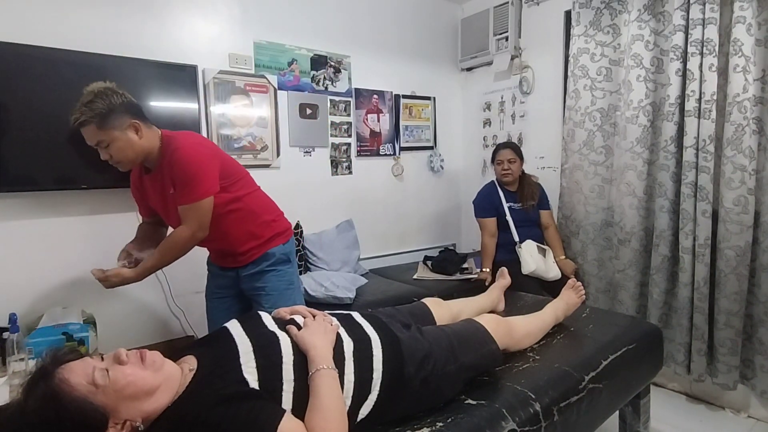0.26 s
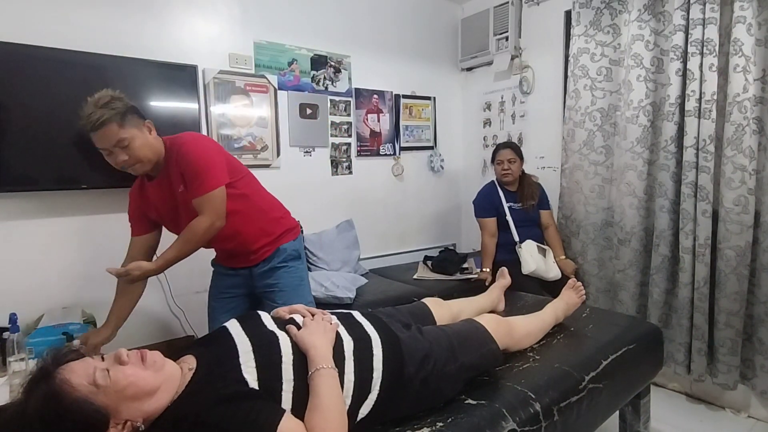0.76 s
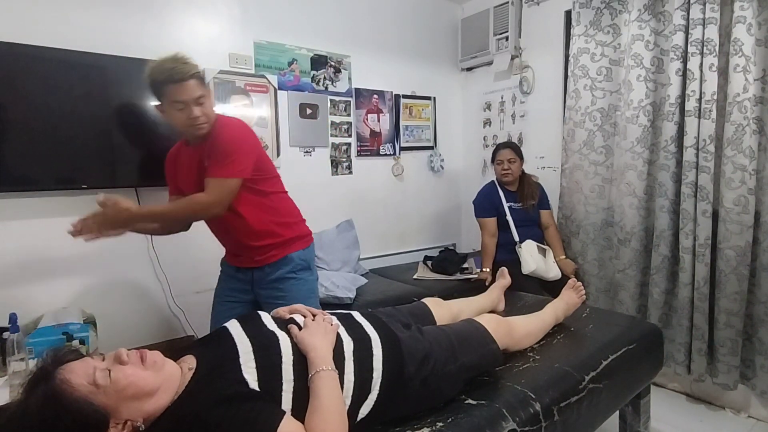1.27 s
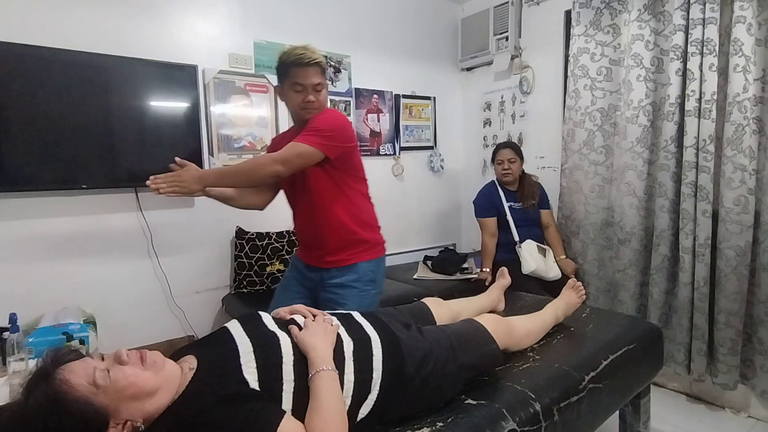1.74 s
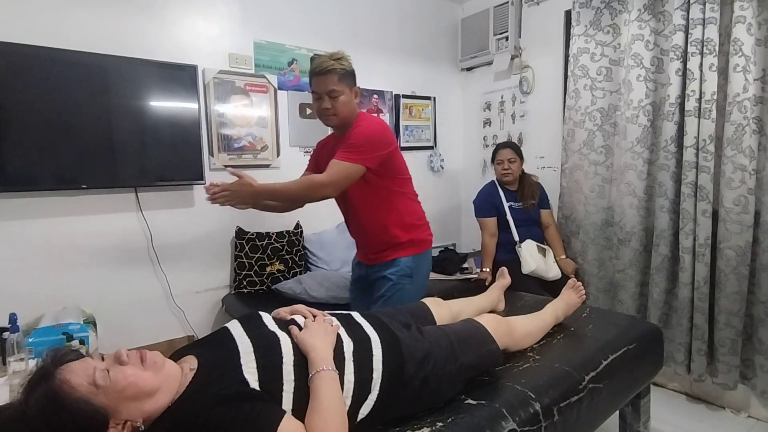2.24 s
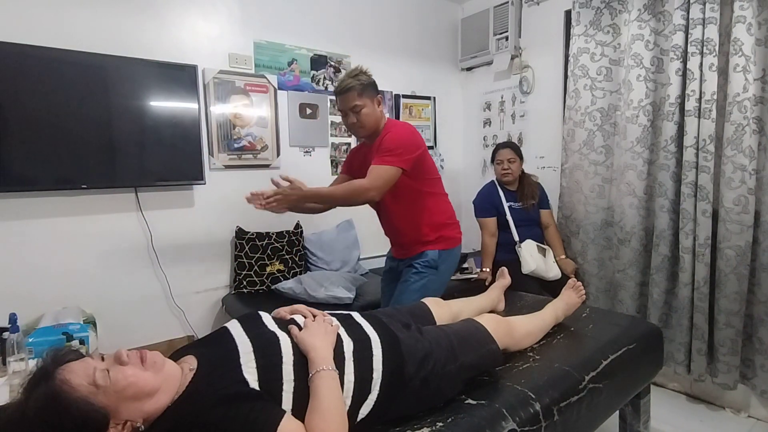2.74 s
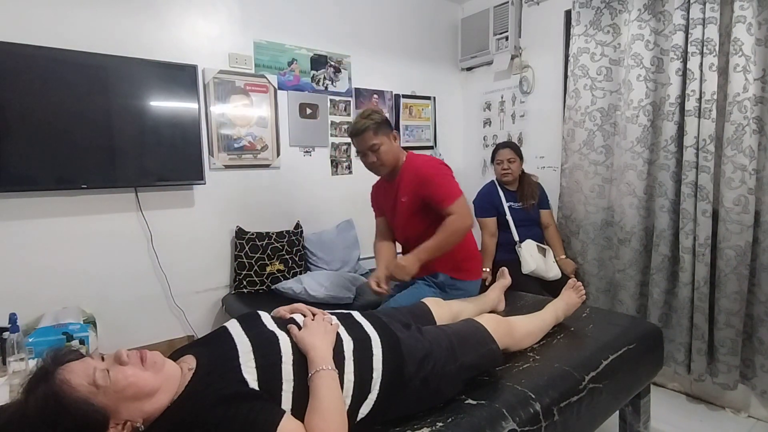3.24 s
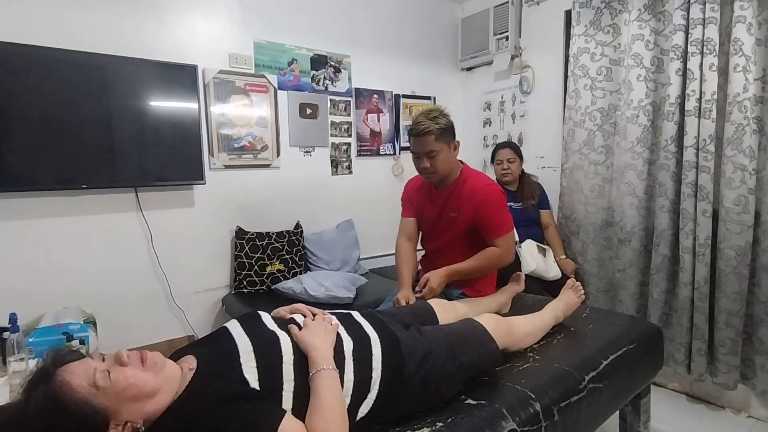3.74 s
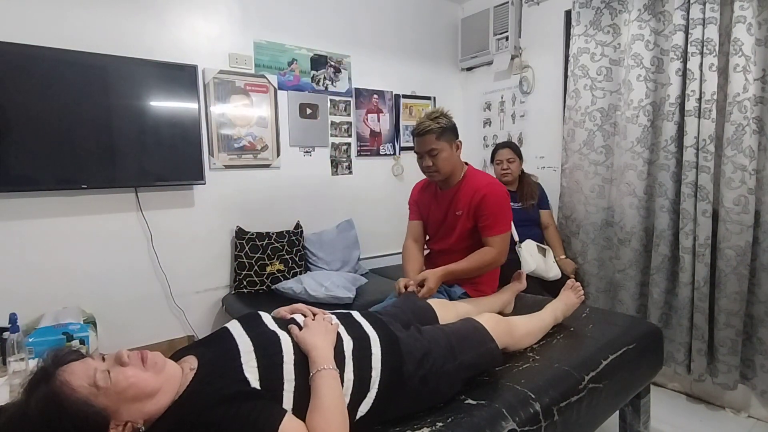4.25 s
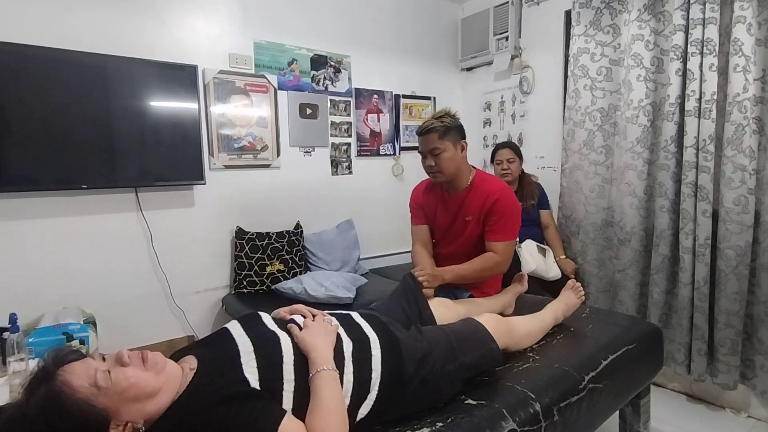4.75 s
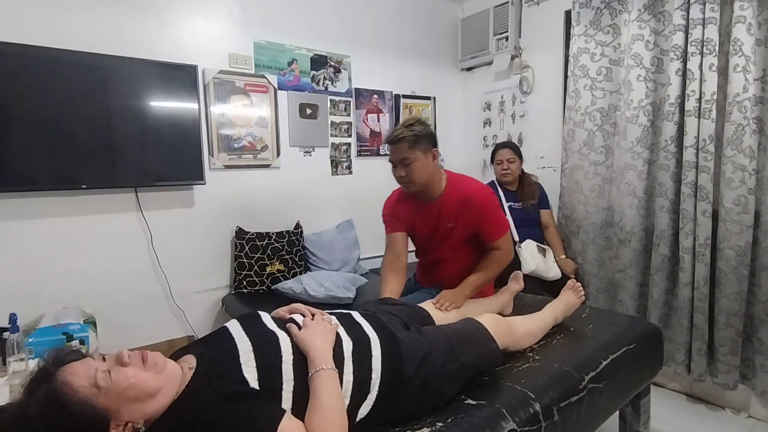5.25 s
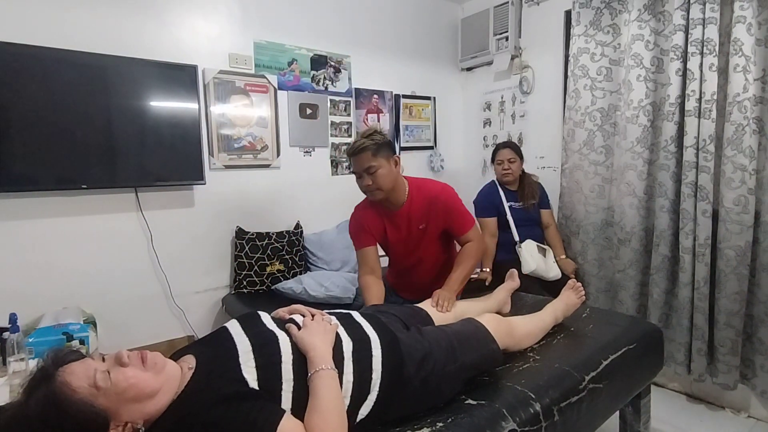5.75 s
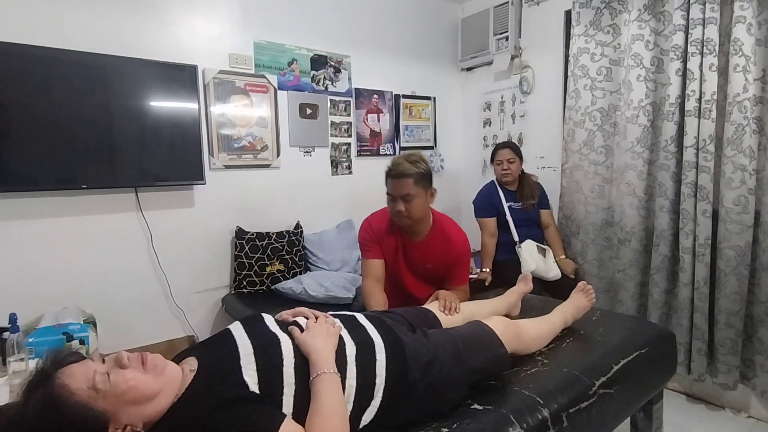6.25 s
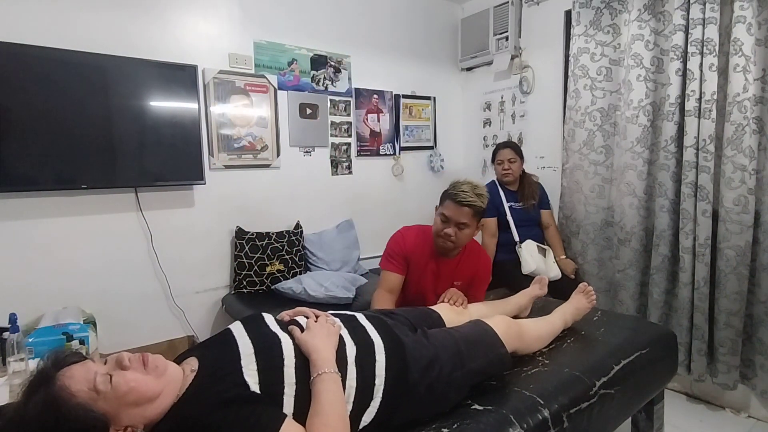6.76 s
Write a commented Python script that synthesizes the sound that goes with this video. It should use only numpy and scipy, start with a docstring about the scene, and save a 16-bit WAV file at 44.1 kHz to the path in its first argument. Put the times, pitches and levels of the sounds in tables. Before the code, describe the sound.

A window air conditioner hums throughout in a small room, a deep, slightly fluttering drone with soft fan air and faint thin whines near the start and around 3 s. Tiny clicks come at 0.4 s. At 0.84 s a bottle meets the table: a dull low knock with a short ring and crackly edge. From 1 to 3 s oiled palms rub in quiet hissing strokes, with cloth rustle, a small tick near 1.45 s and light pats at 2.0 and 2.3 s. A sharper clack lands at 3.22 s, then a brisk bright swish near 3.85 s. At 4.5 s the padded couch creaks and bumps softly. Rustling grows from 5.6 s; between 6.1 and 6.45 s the couch groans, its frame knocking and cushion thudding deeply, the loudest couch movement. A scuff and light rustle follow at 6.8 s over the continuing hum. Stereo, close echo.

```python
"""Air conditioner and padded couch

A window air conditioner hums in a small room: compressor orders, fan and mains tones over shaped noise.
A bottle rings the table's modes; oiled palms, skin and cloth are grainy noise with short noise bursts.
Someone settles on a padded couch: uneven slips make it groan, the strongest ring its frame singly,
and ringing modes thud."""
import sys
import numpy as np
from scipy import signal
from scipy.fft import rfft, irfft, next_fast_len
from scipy.io import wavfile
from scipy.ndimage import map_coordinates

SR = 44100
rng = np.random.default_rng(int(sys.argv[2]) if len(sys.argv) > 2 else 0)


def wav_record(signal):
    """Record a signal, one row per channel, as 16-bit PCM in the file named by sys.argv[1]."""
    frames = np.transpose(np.atleast_2d(signal))
    bounded = np.clip(frames, -1, 1)
    # unit amplitude maps onto the largest positive 16-bit level
    quanta = np.round(bounded * 32767).astype(np.int16)
    wavfile.write(sys.argv[1], SR, quanta)


N = 309004
TIME = np.arange(N) / SR  # s

SHAFT_HZ = 57.16  # compressor turns per second
# compressor orders: multiple of the shaft rate, level/dB, left-right/dB, left lead/rad
COMPRESSOR_ORDERS = [(1, -33, 1, -0.0), (2, -56, -8, 1.1), (3, -47.3, 1, 0.0), (4, -53, 3, 0.2),
                     (5, -59, 1, 0.2), (6, -53, -3, 0.1), (8, -68, 5, -0.4), (13, -70.5, -2, -2.5),
                     (15, -70, -1, -3.1), (16, -69.5, 2, -2.1), (25, -77, 4, -1.1)]
# fan motor and mains tones: f/Hz, level/dB, left-right/dB, left lead/rad
FAN_TONES = [(68.3, -62, 0, 0.1), (72.7, -49, 0, 0.0), (120.1, -67, 5, -0.4), (130.8, -57, 2, 0.3),
             (231.6, -67, 4, -0.1), (234.4, -57, 2, -0.1), (240.2, -59, -2, -0.7), (360.3, -60, 3, 0.4),
             (400.1, -65, -7, 0.5), (800.3, -69.5, 1, -0.3)]
# spectrum of the rushing air: f/Hz, relative density/dB
AIR_SPECTRUM = [(8, -81), (35, -63.5), (60, -67.5), (100, -77.5), (190, -77.5), (330, -80), (520, -83),
                (1000, -89), (2000, -90), (3100, -95.5), (4000, -101), (6300, -107), (10000, -110),
                (15000, -120)]
# cabinet and room resonances in the air noise: f/Hz, width/Hz, lift/dB
AIR_RESONANCES = [(36, 19, -7.5), (72.3, 35, 6.5), (101, 16, -4.5), (141.7, 62.4, 12), (198, 22, -5),
                  (241, 21.4, 9), (278, 10, -6), (292, 9.5, 8.5), (332, 13, -6), (370, 30, 3.5),
                  (427.7, 32, 10), (493, 15, 4), (3300, 220, -2)]
# faint thin whines that come and go: peak t/s, half-length/s, f/Hz, width/Hz, level/dB
WHINES = [(0.368, 0.39, 3160, 260, -67), (.52, 0.26, 1580, 100, -62.5), (2.948, 0.065, 1580, 120, -56.5)]

# diffuse sound at the two microphones: f/Hz, left-right likeness (1 = the same)
STEREO_LIKENESS = [(60, 0.82), (130, 0.84), (300, 0.89), (640, 0.34), (1300, 0), (3000, 0.038), (15000, 0)]
# decay of the room's echo: f/Hz, t60/s
ROOM_DECAY = [(150, 0.77), (1000, 0.24), (4000, 0.26), (14000, 0.27)]
# room null, resonances and notches, left then right microphone: f/Hz, width/Hz, lift/dB
MICROPHONE_PORTS = [
    [(99, 6, -4), (10100, 1850, 5.5), (4180, 1800, -2)],
    [(106, 13, -7.5), (7750, 1620, 9), (4900, 740, -0.5)],
]
TOP_HZ = 15750  # band limit of the microphones

# soft knocks on furniture: t/s, level/dB
KNOCKS = [(.837, -22.5)]
# modes of the table and the bottle: f/Hz, relative level/dB, t60/s
TABLE_MODES = [(140.3, 1.5, 0.2), (223, -9, 0.11), (262, -4, 0.11), (305, -7, 0.087), (390, -16, 0.097),
               (488, -16, 0.18), (595, -19, 0.16), (713, -23, 0.15), (2270, -24, 0.081), (3140, -40, .14)]
# short cracks and ticks as a bottle or hand strikes: t/s, relative level/dB, centre f/Hz, spread/octaves
CRACKS = [(0.8354, -33, 2400, 1.2), (0.843, -31, 2000, 1.1), (1.4525, -30.5, 3600, 0.4),
          (3.222, -30, 2700, 1.1), (3.2288, -22.5, 1000, 0.93), (3.2435, -33, 3300, 0.22),
          (3.255, -41, 3300, 0.3)]
CRACK_T60, CRACK_EDGE_HZ = 0.005, 4080  # decay/s; above the edge the cracks lose their treble
CRACK_WET_DB = 7.5  # echo against direct sound

# spectrum of skin hiss: f/Hz, relative gain/dB
SKIN_SPECTRUM = [(500, -22), (2000, -1.5), (3500, 0.5), (5500, -3), (8000, -2.5), (10500, -7), (13000, -12),
                 (15500, -14.5)]
# spectrum of cloth rustle: f/Hz, relative gain/dB
CLOTH_SPECTRUM = [(100, -8), (300, 10.5), (800, 2.5), (1500, 0), (2600, -4.5), (4000, -14), (8000, -35)]
# strokes of the hands: peak t/s, length/s, relative skin hiss/dB, cloth rustle/dB
STROKES = [(0.05, 0.22, -70, -67), (1.034, 0.23, -51, -58), (1.694, 0.43, -54, -52.5),
           (2.17, 0.3, -57, -63), (2.39, 0.19, -55.5, -52), (2.569, 0.18, -52.5, -52),
           (2.71, 0.25, -53.5, -73), (3.182, 0.81, -60, -52), (3.63, 0.16, -57.5, -53),
           (3.841, 0.13, -40, -44.5), (4.088, 0.32, -59, -52.5), (4.528, 0.22, -58.5, -48),
           (5.1, 0.23, -52.5, -53.5), (5.635, 0.35, -67, -46.5), (5.891, 0.65, -51, -46),
           (6.06, 0.24, -51, -41.5), (6.308, 0.33, -51, -38), (6.788, 0.33, -53, -47)]
RISE_SHARE, STROKE_ROUNDNESS = 0.5, 1.14  # part of a stroke spent speeding up; 1 = pointed, 2 = bell
# between strokes the oiled hands and the clothes keep moving a little
BUSY_FROM_S, BUSY_SKIN_DB, BUSY_CLOTH_DB = 0.88, -67.5, -69
# broad, brighter swishes within the strokes of the palms: peak t/s, half-length/s, f/Hz, width/Hz, level/dB
SWISHES = [(1.06, 0.058, 3670, 1210, -54), (1.715, 0.047, 2200, 1400, -52), (3.93, .035, 3240, 3000, -52.5),
           (5.89, 0.1, 2970, 2800, -51), (6.06, 0.071, 4240, 3020, -56)]
# firm contacts of hand or bottle: t/s, relative body level/dB, centre f/Hz, relative smack level/dB
SLAPS = [(0.836, -37.5, 750, -46), (2.001, -43.5, 1300, -42.5), (2.328, -43.5, 1700, -47.5),
         (3.221, -34, 2000, -40.5), (3.227, -35, 850, -62)]
SLAP_OCTAVES, SLAP_T60 = 1.05, 0.038  # spread of the body; decay/s of body and smack
SMACK_HZ, SMACK_OCTAVES = 7500, 3.7  # colour of the smack
# sticky clicks of oily skin: t/s, relative level/dB, centre f/Hz, spread/octaves, left-right/dB
CLICKS = [(.36, -56.5, 9500, 0.83, 0), (.414, -49.5, 7400, 0.26, -3), (1.699, -41, 7500, 1.2, 3),
          (2.003, -43.5, 7500, 0.13, 0), (2.924, -46.5, 6000, 2, 1), (5.165, -39, 4640, 0.99, 2)]
CLICK_T60 = 0.041  # s
# short dull scuffs and bumps, some following the bottle's knock or a slap:
# t/s, relative level/dB, centre f/Hz, left-right/dB
SCUFFS = [(.22, -42, 890, 7), (.856, -40, 750, -1), (.872, -40, 650, -2), (1.674, -37, 1870, 3),
          (1.782, -38, 1110, -3), (2.341, -44, 2800, 0), (3.254, -41, 1150, -6), (4.519, -42, 1400, -4),
          (4.555, -44, 1400, 6), (4.589, -38, 1450, -1), (5.275, -41, 895, -4), (5.757, -34, 970, -1),
          (6.025, -34, 990, -2), (6.181, -32, 940, 1.5), (6.32, -45, 1090, -7), (6.817, -32.5, 1300, 0)]
SCUFF_OCTAVES, SCUFF_T60 = 0.6, 0.033  # spread; decay/s

# modes of the couch's padded frame: f/Hz, width/Hz, relative level/dB
COUCH_MODES = [(82.5, 16, 7), (138, 35, 0.5), (177, 24, 3), (226, 13.5, 1), (290, 18, -1), (345, 33, -4.5),
               (395, 52, -6.5), (498, 60, -7), (530, 40, -4.5), (615, 49, -7.5), (751, 24, -10.5),
               (935, 40, -8.5), (1230, 220, -17.5)]
# groans as weight shifts: peak t/s, rise/s, fall/s, level/dB, centre f/Hz, spread/octaves
GROANS = [(4.49, 0.092, 0.076, -38.5, 260, 1.05), (4.57, 0.026, 0.064, -38, 340, 0.8),
          (6.095, 0.052, 0.034, -37, 590, 0.58), (6.189, 0.0053, 0.057, -43.5, 1110, 0.83),
          (6.275, 0.044, 0.06, -25.5, 260, 1.8), (6.324, 0.033, 0.045, -30, 363, 1.9),
          (6.386, 0.065, 0.071, -33, 120, 0.85)]
# strong single slips within the couch's groans: t/s, peak level/dB, centre f/Hz
STRONG_SLIPS = [(4.511, -34, 300), (4.549, -30.5, 380), (4.556, -36, 644), (4.591, -31, 320),
                (6.231, -25.5, 330), (6.247, -19, 326), (6.27, -21.5, 348), (6.279, -28, 600),
                (6.316, -23, 300), (6.326, -29, 800), (6.342, -31, 395), (6.391, -25, 190),
                (6.428, -32, 500)]
# thuds of the cushion giving way: t/s, relative level/dB, pitch f/Hz, t60/s
THUDS = [(2.331, -33, 387, 0.12), (4.509, -29, 131, 0.18), (4.547, -26.5, 290.7, 0.2),
         (4.591, -32, 286, 0.14), (6.088, -24.5, 159, 0.14), (6.233, -18, 149, 0.24),
         (6.303, -18, 72.3, 0.36), (6.312, -17, 174.7, 0.3), (6.357, -20, 173, 0.3),
         (6.44, -20, 175.3, 0.1)]
# what a thud rings with: multiple of its pitch, relative level/dB
CUSHION_MODES = [(.45, -9), (0.999, 1), (1.9, -26)]


def amp(db):
    """Decibels to gain."""
    return 10 ** (np.asarray(db) / 20)


def unit(x):
    """Scale to rms 1."""
    return x / np.sqrt(np.mean(x ** 2) + 1e-20)


def along(points, hz):
    """Read a curve of (f/Hz, value) points on a log axis."""
    f, value = np.transpose(points)
    return np.interp(np.log(hz + 1), np.log(f + 1), value)


def bumps(rows, hz):
    """Gain of resonant lifts and dips."""
    return amp(sum(db / (1 + (2 * (hz - f) / width) ** 2) for f, width, db in rows))


def band(hz, centre_hz, octaves):
    """A bell-shaped gain on a log axis."""
    return 1 / (1 + (np.log2((hz + 1) / centre_hz) / octaves) ** 2 / 2) ** 2


def wobble(rate):
    """A smooth random curve, rate knots a second."""
    knots = rng.standard_normal(int(N * rate / SR) + 4)
    return map_coordinates(knots, [TIME * rate])


def filtered(x, response):
    """Shape x by a response of frequency."""
    n = x.shape[-1]
    m = next_fast_len(n + SR // 2)  # spare room keeps the filter's ring from wrapping round
    return irfft(rfft(x, m) * response(np.fft.rfftfreq(m, 1 / SR)), m)[..., :n]


def pan(db):
    """Left and right gains that differ by db."""
    return amp([[db / 2], [-db / 2]])


def add(out, s, x):
    """Mix a stereo sound in at time s."""
    part = out[:, round(s * SR):][:, :x.shape[1]]
    part += x[:, :part.shape[1]]


def diffuse(pair):
    """Blend two unrelated signals into left and right: alike in the bass, unrelated in the treble."""
    def blend(hz):
        turn = np.arccos(np.clip(along(STEREO_LIKENESS, hz), -1, 1)) / 2
        return np.array([np.cos(turn), np.sin(turn)])
    mid, side = filtered(pair, blend)
    return np.array([mid + side, mid - side])


def tail():
    """A fresh stereo answer of the close walls: noise that decays per frequency, of energy 1."""
    hz, t, z = signal.stft(rng.standard_normal((2, SR // 2)), SR, nperseg=256)
    decay = amp(-60 * t / along(ROOM_DECAY, hz)[:, None])
    pair = diffuse(signal.istft(z * decay, SR, nperseg=256)[1][:, :SR // 2])
    return pair / np.linalg.norm(pair[0])


def room(x, wet_db):
    """The direct sound and its echo from the walls."""
    echo = signal.fftconvolve(x[None], tail(), axes=1)[:, :len(x)]
    return (x + amp(wet_db) * echo) / np.hypot(1, amp(wet_db))


def tone(cycles, db, pan_db, lead):
    """A pure tone as the two microphones meet it in the room's standing waves."""
    side = np.array([[.5], [-.5]])
    return np.sqrt(2) * amp(db + side * pan_db) * np.cos(2 * np.pi * cycles + side * lead)


def hum(drift_hz=0.017, flutter_db=1.1, wall_scatter=0.073):
    """The compressor turns a little under the mains rate; its orders beat with the fan and mains tones."""
    # one stroke a turn keeps the orders nearly in step; wall_scatter is in cycles
    turns = np.cumsum(SHAFT_HZ + drift_hz * wobble(1.53)) / SR
    load = flutter_db * wobble(13)
    out = np.zeros((2, N))
    for k, db, pan_db, lead in COMPRESSOR_ORDERS:
        cycles = k * turns + rng.normal(0, wall_scatter)
        # the upper orders feel the changing load most
        out += tone(cycles, db + load * (1 - 1 / k), pan_db, lead)
    for hz, db, pan_db, lead in FAN_TONES:
        out += tone(hz * TIME + rng.random(), db, pan_db, lead)
    return out


def air(level_db=-44):
    """The fan's turbulence: noise coloured by the cabinet and the room."""
    noise = diffuse(rng.standard_normal((2, N)))
    rush = filtered(noise, lambda hz: amp(along(AIR_SPECTRUM, hz)) * bumps(AIR_RESONANCES, hz))
    return amp(level_db) * unit(rush)


def swells(rows, flicker_db=5.0):
    """Bands of noise swell, flicker and fade: thin whines or broad swishes."""
    out = np.zeros((2, N))
    for s, length, centre_hz, width_hz, db in rows:
        noise = rng.standard_normal((2, 2 * SR))
        swish = filtered(noise, lambda hz: 1 / (1 + (2 * (hz - centre_hz) / width_hz) ** 2))
        swish = unit(swish * amp(flicker_db * wobble(25.4)[:2 * SR]))
        start = max(s - 1, 0)
        swell = np.exp(-((start + TIME[:2 * SR] - s) / length) ** 2)
        add(out, start, amp(db) * swell * swish)
    return out


def ringing(modes, attack_cycles):
    """Decaying sine modes after a soft blow: the lower the mode, the slower it builds up."""
    t = np.arange(SR // 2) / SR
    out = np.zeros(len(t))
    for hz, db, t60 in modes:
        build_up = 1 - np.exp(-t * hz / attack_cycles)
        out += amp(db - 60 * t / t60) * np.sin(2 * np.pi * hz * t) * build_up
    return out


def knocks(attack_cycles=1.5, wet_db=-15):
    """The bottle meets the table, which rings low and briefly."""
    out = np.zeros((2, N))
    for s, db in KNOCKS:
        add(out, s, amp(db) * room(ringing(TABLE_MODES, attack_cycles), wet_db))
    return out


def contact(db, centre_hz, octaves, hold_s, t60, pan_db, wet_db=10.0, softness_hz=13000,
            attack_s=0.00075):
    """A short noise burst while surfaces meet, dulled on top; a dense echo builds as it feeds the room."""
    t = np.arange(SR // 2) / SR
    colour = lambda hz: unit(band(hz, centre_hz, octaves) / (1 + (hz / softness_hz) ** 4))
    envelope = (1 - np.exp(-t / attack_s)) * amp(db - 60 * np.maximum(t - hold_s, 0) / t60)
    direct = rng.standard_normal(len(t)) * envelope
    echo = tail() * np.sqrt(np.cumsum(envelope ** 2))  # grows with the energy sent out so far
    mix = filtered(direct + amp(wet_db) * echo, colour) / np.hypot(1, amp(wet_db))
    return mix * pan(pan_db)


def cracks(hold_s=0.00071):
    """A bottle or hand strikes: very short bursts with a fast attack and room echo, their treble cut off."""
    out = np.zeros((2, N))
    for s, db, centre_hz, octaves in CRACKS:
        add(out, s, contact(db, centre_hz, octaves, hold_s, CRACK_T60, pan_db=0,
                            wet_db=CRACK_WET_DB, attack_s=0.00039))
    return filtered(out, lambda hz: 1 / (1 + (hz / CRACK_EDGE_HZ) ** 20))


def strokes():
    """Skin and cloth gains: each stroke swells and dies with the hand's speed, over a slight steady stir."""
    fade_in = np.clip((TIME - BUSY_FROM_S) * 20, 0, 1)
    power = amp(2 * np.array([[BUSY_SKIN_DB], [BUSY_CLOTH_DB]])) * fade_in
    for s, length, hiss_db, rustle_db in STROKES:
        away = np.maximum((s - TIME) / RISE_SHARE, (TIME - s) / (1 - RISE_SHARE)) / length
        swell = np.exp(-away ** STROKE_ROUNDNESS)
        power = power + (amp([[hiss_db], [rustle_db]]) * swell) ** 2
    return np.sqrt(power)


def friction(spectrum, grain_db, judder_db):
    """Tiny catches of a sliding surface, clumped by the unsteady hand and scattered by the walls."""
    clumping = amp(grain_db * wobble(700) + judder_db * wobble(35))
    catches = rng.standard_normal(N) * clumping
    smooth = diffuse(rng.standard_normal((2, N)))
    sliding = smooth + 0.77 * unit(room(catches, wet_db=16.5))
    return unit(filtered(sliding, lambda hz: amp(along(spectrum, hz))))


def rubbing(skin_db=-0.5):
    """Palms slide over skin and clothes shift: two kinds of friction noise under the stroke gains."""
    hiss, rustle = strokes()
    skin = amp(skin_db) * hiss * friction(SKIN_SPECTRUM, grain_db=7.5, judder_db=2.5)
    cloth = rustle * friction(CLOTH_SPECTRUM, grain_db=-0.5, judder_db=6.5)
    return skin + cloth


def scuffs(hold_s=0.00053):
    """Short dull scuffs and bumps: noise bursts in a low or middle band."""
    out = np.zeros((2, N))
    for s, db, centre_hz, pan_db in SCUFFS:
        add(out, s, contact(db, centre_hz, SCUFF_OCTAVES, hold_s, SCUFF_T60, pan_db))
    return out


def clicks(hold_s=0.0023):
    """Oily skin parts with a small, high click."""
    out = np.zeros((2, N))
    for s, db, centre_hz, octaves, pan_db in CLICKS:
        add(out, s, contact(db, centre_hz, octaves, hold_s, CLICK_T60, pan_db))
    return out


def slaps(hold_s=0.005, body_pan_db=2, smack_pan_db=-3):
    """A firm contact has a broad body and a bright smack."""
    out = np.zeros((2, N))
    for s, db, centre_hz, smack_db in SLAPS:
        add(out, s, contact(db, centre_hz, SLAP_OCTAVES, hold_s, SLAP_T60, body_pan_db))
        add(out, s, contact(smack_db, SMACK_HZ, SMACK_OCTAVES, hold_s, SLAP_T60, smack_pan_db))
    return out


def frame(hz):
    """The response of the couch's padded frame: damped resonances of alternating sign."""
    response = 0
    for k, (f, width, db) in enumerate(COUCH_MODES):
        damping = 1j * hz * width
        response = response + (-1) ** k * amp(db) * damping / (f * f - hz * hz + damping)
    return response


def groans(slip_rate=150, unevenness=.65, size_db=3.5):
    """The cover sticks and slips at an uneven rate (slips/s); every slip rings the padded frame."""
    out, t = np.zeros((2, N)), np.arange(SR) / SR - .5
    for s, rise, fall, db, centre_hz, octaves in GROANS:
        travel = np.cumsum(slip_rate * np.exp(unevenness * wobble(90)[:SR])) / SR
        # one impulse of random size each time the travel passes a whole number
        slips = np.diff(np.floor(travel), prepend=0) * amp(size_db * rng.standard_normal(SR))
        ring = filtered(room(slips, wet_db=0.0), lambda hz: frame(hz) * band(hz, centre_hz, octaves))
        pressure = np.exp(np.minimum(t / rise, -t / fall))
        groan = unit(ring * pressure) * np.sqrt(np.mean(pressure ** 2))
        add(out, s - .5, amp(db) * groan)
    return out


def strong_slips(octaves=1.05, wet_db=-5, lead_s=.02):
    """Strong single slips within the groans: each is one impulse that rings the padded frame."""
    out, slip = np.zeros((2, N)), signal.unit_impulse(SR // 2, round(lead_s * SR))
    for s, db, centre_hz in STRONG_SLIPS:
        ring = filtered(room(slip, wet_db), lambda hz: frame(hz) * band(hz, centre_hz, octaves))
        add(out, s - lead_s, amp(db) * ring / np.abs(ring).max())
    return out


def thuds(attack_cycles=1.0, wet_db=-17, pan_db=2.5):
    """The padded seat drops in heavy steps under the weight; each rings a few modes of its own pitch."""
    out = np.zeros((2, N))
    for s, db, hz, t60 in THUDS:
        modes = [(hz * multiple, db + level, t60) for multiple, level in CUSHION_MODES]
        add(out, s, room(ringing(modes, attack_cycles), wet_db))
    return out * pan(pan_db)


def scene():
    """The machine behind, then knocks and cracks, hands and clothes, and the couch in front."""
    machine = hum() + air() + swells(WHINES)
    strikes = knocks() + cracks()
    hands = rubbing() + swells(SWISHES) + scuffs() + clicks() + slaps()
    couch = groans() + strong_slips() + thuds()
    return machine + strikes + hands + couch


def record(dry):
    """Each microphone's place and port colour the sound; nothing passes above the band limit."""
    return filtered(dry, lambda hz: np.array([bumps(port, hz) for port in MICROPHONE_PORTS]) * (hz < TOP_HZ))


dry = scene()
out = record(dry)
wav_record(out)
```